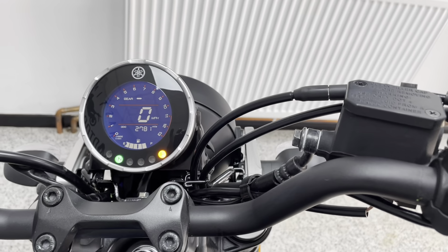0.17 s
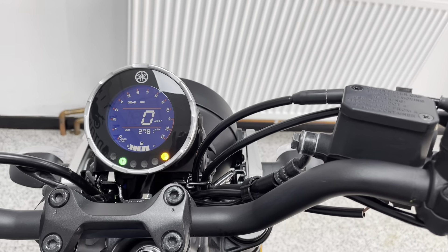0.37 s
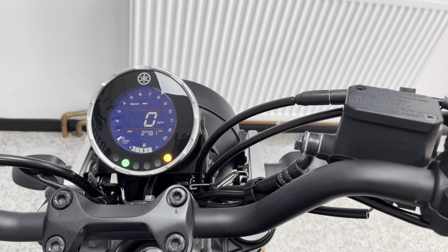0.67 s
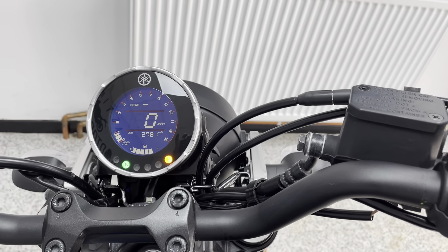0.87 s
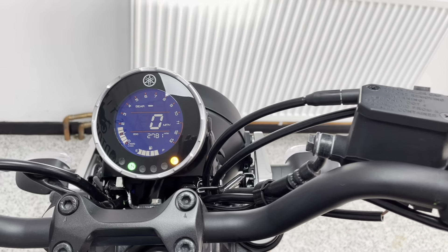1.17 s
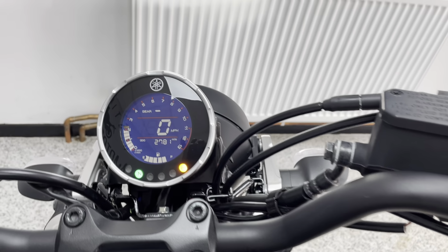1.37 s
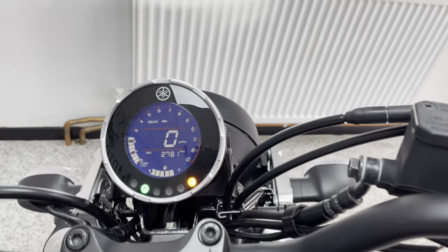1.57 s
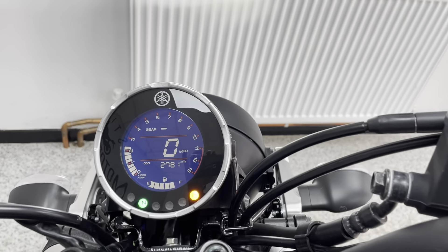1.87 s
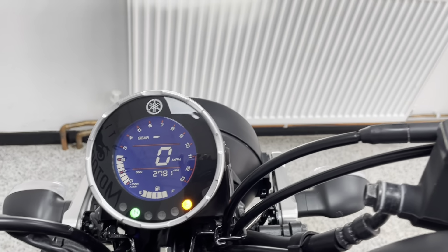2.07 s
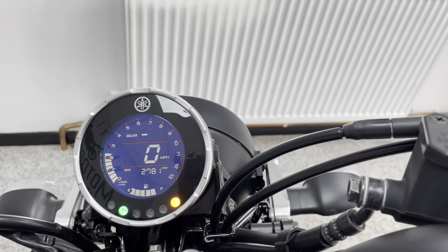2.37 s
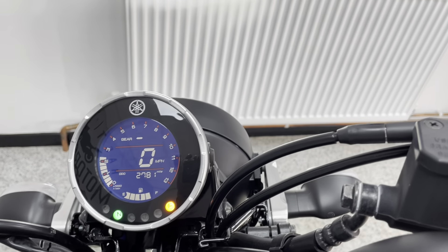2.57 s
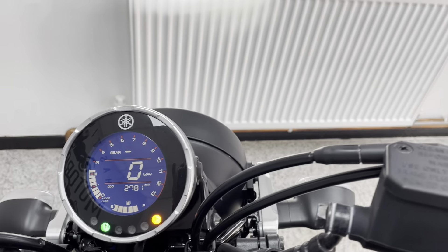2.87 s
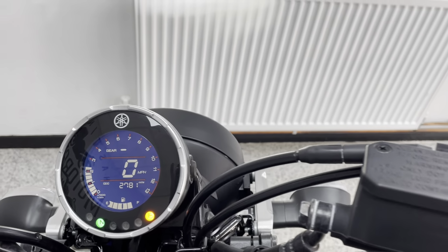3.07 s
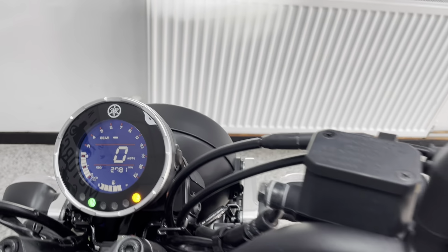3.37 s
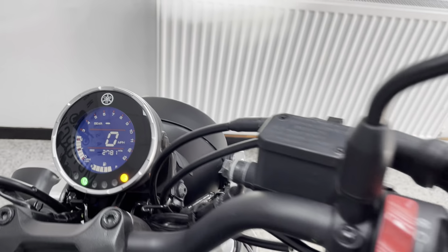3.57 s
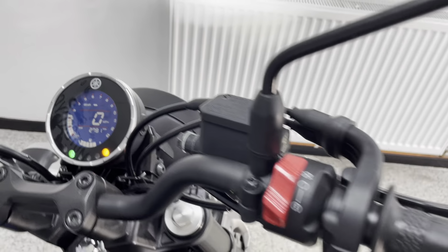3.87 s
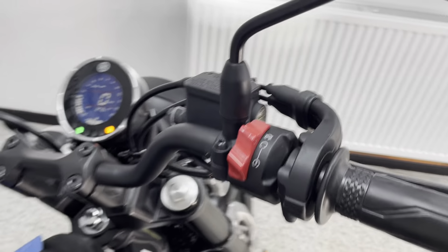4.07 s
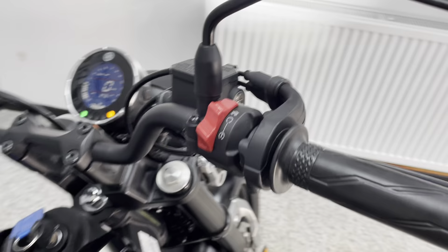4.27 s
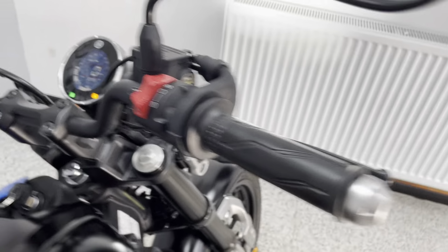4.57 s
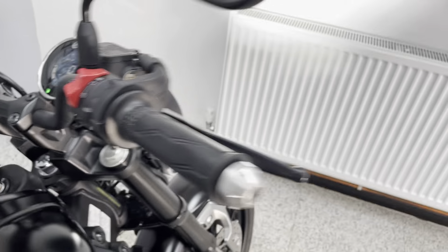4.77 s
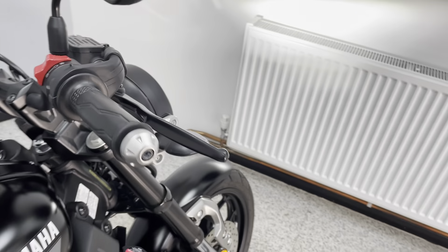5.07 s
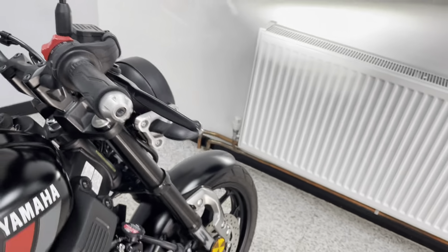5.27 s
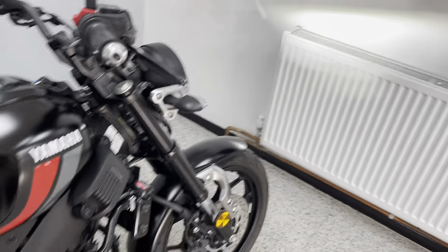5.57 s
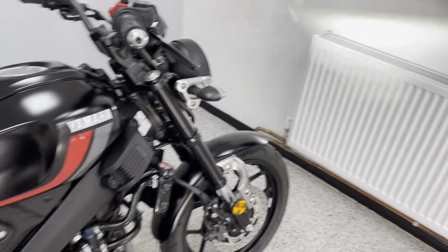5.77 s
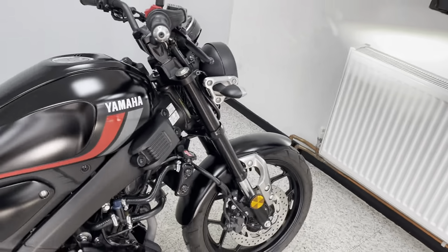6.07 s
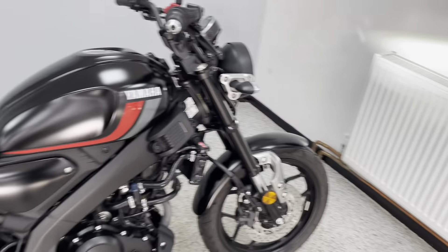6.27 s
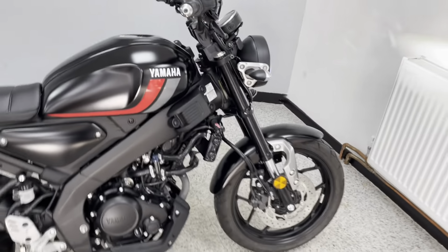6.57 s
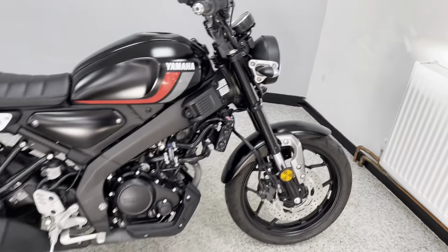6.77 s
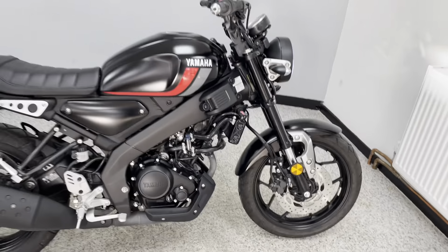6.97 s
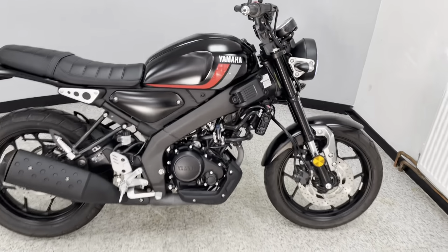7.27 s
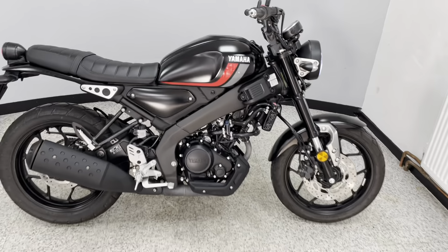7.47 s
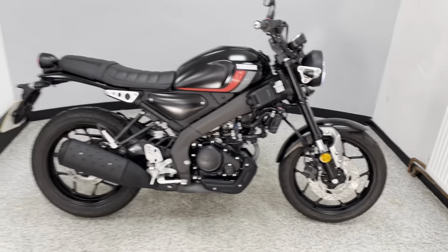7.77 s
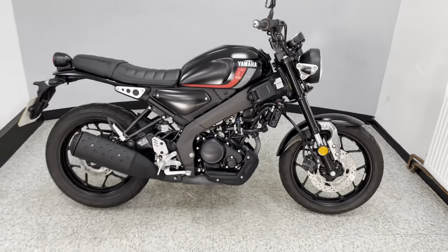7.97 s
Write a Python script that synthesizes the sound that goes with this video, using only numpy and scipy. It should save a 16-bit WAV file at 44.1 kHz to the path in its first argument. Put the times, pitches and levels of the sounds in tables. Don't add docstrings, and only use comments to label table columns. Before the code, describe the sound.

A quiet, hard-walled room with a faint low hum. At about 0.17 s a tiny button click, then a cluster of crisp relay clicks at 0.2-0.3 s. From 0.3 to 0.7 s the starter engages with a clunk, grinding and whining in one long push and a few shorter ones, gear pitch rising, with thin metallic squeals. Around 0.7 s the small single-cylinder engine catches with a hard casing shake; the freed starter whines and hisses away, with clacks near 0.95 s. Firings start slow and uneven, quickening by 1.3 s to a fast idle, about nineteen thumps a second, nearly steady to the end at 8 s. Low, boomy exhaust pulses sit under dry valve ticking, chain rattle and ringing covers. The close phone backs away around the right side: bass swells from 2 s, treble brightens near 3.5-4.5 s, the exhaust drifts across the stereo image, and rattle softens slightly after 6.5 s.

```python
import sys
import numpy as np
from scipy import signal
from scipy.fft import rfft, irfft, next_fast_len
from scipy.io import wavfile
from scipy.ndimage import uniform_filter1d, map_coordinates

SR = 44100
rng = np.random.default_rng(int(sys.argv[2]) if len(sys.argv) > 2 else 0)


def master(y):
    cut = np.clip(np.atleast_2d(y).T, -1, 1)
    pcm = np.round(cut * 32767)
    wavfile.write(sys.argv[1], SR, pcm.astype(np.int16))


def nominal_scale(level):
    x = np.asarray(level, float) / 20
    return 10 ** x


N = 358974
T, SIZE = np.arange(N) / SR, next_fast_len(N, True)
HZ = np.maximum(np.fft.rfftfreq(SIZE, 1 / SR), 1)

# frequency in Hz, level in dB per Hz.
ROOM = [(18, -31), (30, 0), (55, -0.5), (241, -8), (336, -19), (376, -16.5), (654, -21), (816, -18),
        (912, -13), (974, -14), (6000, -44), (7800, -60), (13200, -68)]
# start in seconds, peak in dB, ring in Hz, decay in seconds.
CLICKS = [(.168, -53, 4000, .01), (0.213, -32, 5070, 0.011), (.2164, -30, 4040, 0.009),
          (0.2248, -31.5, 1980, 0.038), (0.251, -34, 4300, 0.013), (.2618, -33, 2980, 0.028),
          (0.2617, -30, 11000, .02), (.2255, -31, 10000, 0.014), (0.294, -38, 3000, 0.022),
          (0.308, -13, 1170, 0.068), (.5317, -23, 2050, .04), (0.619, -25, 1700, .05),
          (0.697, -14, 2080, 0.061), (0.9369, -9, 2520, 0.028), (.947, -16, 1800, 0.08),
          (.9794, -18, 5600, .012), (.995, -18, 1200, 0.055)]
# start in seconds, peak in dB.
THUDS = [
    (.2, -46),
    (.31, -43),
    (.41, -34),
    (.52, -46),
    (.6, -38),
]
# frequency in Hz, level in dB per Hz.
GRIND = [(300, -4.5), (500, -3.5), (800, -2.5), (1200, 2.5), (1800, -2), (2600, -6), (3500, -10.5),
         (5000, -13.5), (6500, -17.5), (7500, -7), (9000, -35), (11000, -22), (14000, -29), (15000, -29.7)]
# frequency in Hz, width in Hz, level in dB.
HOUSING = [(2120, 105, -21), (2320, 30, -26), (3840, 48, -12), (4740, 34, -1), (5000, 35, -8),
           (6160, 36, 5), (6270, 19, 1), (6900, 27, 10), (7660, 32, -9)]
# start in seconds, attack in seconds, hold until in seconds, release in seconds, level in dB.
STROKES = [
    (.315, 0.059, .478, 0.031, 5.5),
    (0.522, 0.013, 0.55, 0.07, 8.5),
    (0.609, .011, 0.661, .017, 7.5),
    (.69, .012, 0.75, .03, -1),
]
# time in seconds, pitch in Hz, level in dB.
MESH = [(.3, 1540, -42), (.36, 1540, -44), (.395, 1555, -30), (.475, 1760, -28.5), (.5, 1790, -45),
        (.55, 2110, -32), (.6, 2060, -42), (.645, 2050, -33), (.72, 2100, -50)]
# start in seconds, end in seconds, frequency in Hz, width in Hz, level in dB.
SQUEALS = [(0.36, 0.517, 6960, 120, -24.5), (0.35, 0.52, 6270, 130, -34), (0.31, 0.53, 5150, 150, -37),
           (0.3, 0.356, 2200, 90, -33), (0.287, 0.47, 1220, 140, -31), (0.503, 0.59, 6200, 170, -32.5),
           (0.604, 0.662, 6270, 150, -26), (.61, 0.71, 7800, 80, -39), (0.61, 0.68, 1717, 220, -25.5),
           (0.48, 0.61, 960, 150, -36)]
# time in seconds, armature turns per second.
COAST_HZ = [(.7, 239), (.72, 240), (.78, 248.5), (.85, 253), (.98, 259), (1.5, 259)]
# time in seconds, whine in dB, brush hiss in dB.
COAST = [(.7, -70, -60), (.72, -45, -55), (.77, -41, -55), (.82, -46, -55), (.86, -51, -54),
         (.98, -50, -48), (1.02, -64, -43), (1.3, -70, -43), (1.5, -70, -58)]
# multiple of the turning speed, level in dB.
COAST_ORDERS = [(1, 12.5), (2, 8), (5, 5), (7, 10), (20, 4)]
# time in seconds, firings per second.
FIRING = [(0.69, 8.938), (0.9, 7.424), (1.0, 12.902), (1.3, 17.801), (1.45, 18.308), (2.45, 18.959),
          (2.95, 18.96), (3.45, 19.604), (4.7, 19.059), (4.95, 19.685), (5.2, 19.209), (5.45, 19.72),
          (5.95, 19.222), (6.7, 18.792), (7.2, 19.188), (7.45, 18.761), (7.7, 19.057), (8.14, 18.636)]
# time in seconds, metres walked, exhaust strength in dB.
PATH = [(.7, 0, -6), (.8, 0, -9), (1.0, 0, -7), (1.24, 0, 0), (1.5, 0.01, -5), (2.1, 0.05, -1.6),
        (2.4, 0.14, .9), (3.0, 0.19, 1.9), (3.5, 0.32, 1.9), (4.1, 0.55, 1.5), (4.6, 0.67, 1.0),
        (5.0, 0.92, 0.6), (5.6, 1.18, 0.5), (6.3, 1.71, 1.0), (6.7, 2.18, 0.1), (7.4, 2.61, -0.2),
        (7.8, 2.8, -0.4), (8.14, 2.99, -1.6)]
# frequency in Hz, level in dB per Hz.
RATTLE = [(300, 5), (420, -7), (600, -4), (850, -1), (1200, -7), (1700, -8), (2400, -10), (3300, -14.5),
          (4500, -18), (6000, -24.5), (8000, -26), (10500, -28), (13000, -29), (15000, -30.5)]
# frequency in Hz, width in Hz, level in dB.
COVERS = [(466, 36, -3.5), (670, 60, -8), (839, 33, -13.5), (1335, 143, -11.5), (3060, 350, -19.5)]
# start in seconds, end in seconds, frequency in Hz, width in Hz, level in dB.
PANELS = [(0.64, 1.43, 1400, 77, -38), (.9, 4.7, 1420, 130, -40.5), (1.5, 2.8, 2950, 120, -45),
          (3.79, 4.44, 1900, 97, -35.5), (3.97, 4.53, 2100, 130, -37), (3.7, 4.45, 1610, 65, -37.5),
          (4.06, 4.84, 1460, 120, -37), (3.43, 4.7, 590, 64, -39), (3.7, 6.55, 3140, 230, -37.5),
          (5, 5.4, 2200, 96, -38), (5.82, 6.74, 1440, 76, -33.5), (6.48, 7.46, 1640, 88, -35),
          (6.3, 8, 2750, 130, -43), (4.9, 8.7, 3355, 410, -38), (6.2, 8.6, 2950, 160, -38.5),
          (7.2, 9.3, 1550, 200, -37)]
# start in seconds, low boost in dB, high boost in dB, fade in seconds.
CATCHES = [
    (.66, 16, 8, 0.031),
    (.98, 1.5, 6.5, 0.17),
    (1.2, 3, 0, 0.046),
]
# middle in seconds, half length in seconds, level in dB.
COVER_RINGS = [(.74, .05, 10), (1.45, 0.066, 1), (2.31, 0.062, 10), (2.85, 0.054, 9), (3.16, 0.2, 11),
               (3.72, 0.27, 9), (4.2, 0.19, 9), (4.673, 0.25, 8.5), (6.04, 0.34, 14.5), (7.4, 0.67, 7.5)]
# frequency in Hz, crest level in dB, standing share 0-1, crest position in m, crest spacing in m.
WAVES = [(76, -22, .98, 1.82, 5.84), (96, -15, .35, 1.17, 2.33), (115, -22.8, .14, 1.11, 1.76),
         (134, -30.4, .11, 1.05, 1.25), (153, -31, .36, 2.63, 3.94), (172, -37.5, .45, .385, 1.47),
         (191, -30, .45, .3, 6.5), (210, -34.7, .3, 1.1, 3.2)]
# frequency in Hz, lead of the left port in radians.
PORTS = [(0, 0), (700, .3), (1400, .7), (3400, .4), (5500, .2), (6900, -1.3), (7700, -2.95), (8900, -3.35),
         (10600, -6.1), (12200, -6.45), (13700, -8.6), (14200, -9.3), (16000, -9.5)]
# frequency in Hz, likeness 0-1.
LIKENESS = [(30, 1), (60, 0.97), (200, 1), (500, 0.56), (1400, 0.37), (3000, 0.54), (6000, 0.62),
            (8000, 0.94), (12000, 0.34), (14000, 0.83)]


def level(x):
    return x / np.sqrt(np.mean(x ** 2))


def curves(table):
    s, *columns = np.transpose(table)
    return [np.interp(T, s, c) for c in columns]


def over_hz(table):
    hz, value = np.transpose(table)
    return np.interp(np.log(HZ), np.log(np.maximum(hz, 1)), value)


def shaped(x, gain):
    return irfft(rfft(x, SIZE) * gain, SIZE)[:N]


def noise():
    return rng.standard_normal(N)


def ring(hz, width):
    return 1j * HZ * width / (hz ** 2 - HZ ** 2 + 1j * HZ * width)


def tail(decay_s):
    return 1 / (1 + 2j * np.pi * HZ * decay_s)


def step(x, at, width):
    return .5 + .5 * np.tanh((x - at) / width)


def wander(rate):
    k = int(SR / rate)
    held = np.repeat(rng.standard_normal(N // k + 1), k)
    return uniform_filter1d(uniform_filter1d(held, k), k)[:N]


def ticks(phase, scatter_db):
    at = np.flatnonzero(np.diff(np.floor(phase), prepend=np.floor(phase[0])) > 0)
    out = np.zeros(N)
    out[at] = nominal_scale(scatter_db * rng.standard_normal(len(at)))
    return out


def moving(x, hz, width):
    carrier = np.sin(2 * np.pi * np.cumsum(hz) / SR)
    return level(shaped(x, tail(1 / (np.pi * width))) * carrier)


def glints(table, x):
    out, spectrum = np.zeros(N), rfft(x, SIZE)
    for start, end, hz, width, db in table:
        swell = np.sin(np.pi * np.clip((T - start) / (end - start), 0, 1))
        out += nominal_scale(db) * swell * level(irfft(spectrum * ring(hz, width) ** 2, SIZE)[:N])
    return out


def room_tone():
    colour = nominal_scale(over_hz(ROOM))
    return [nominal_scale(-51 + 0.8 * wander(28)) * level(shaped(noise(), colour)) for _ in range(2)]


def knocks():
    out, t = np.zeros(N), np.arange(4096) / SR
    for s, db, hz, decay in CLICKS:
        snap = rng.standard_normal(4096)
        part = signal.butter(1, [0.66 * hz, 1.18 * hz], "band", fs=SR, output="sos")
        crack = .13 * snap + signal.sosfilt(part, snap)
        fade = np.exp(-np.log(1000) * t / max(decay, .005))
        out[int(s * SR):][:4096] += nominal_scale(db) * level(crack) * fade / 2
    for s, db in THUDS:
        out[int(s * SR):][:4096] += nominal_scale(db) * np.sin(2 * np.pi * 42 * t) * np.sin(np.pi * t / t[-1]) ** 2
    return shaped(out, 1 / (1 + (HZ / 9000) ** 2))


def coasting_whine():
    (turns,) = curves(COAST_HZ)
    turn = 2 * np.pi * np.cumsum(turns * (1 + 0.0015 * wander(53.7))) / SR
    return sum(nominal_scale(db + 2.9 * wander(39.2)) * np.sin(k * turn) for k, db in COAST_ORDERS)


def starter():
    grind_db = -30
    for start, attack, until, release, db in STROKES:
        push = np.minimum((T - start) / attack, 1 - (T - until) / release)
        grind_db = grind_db + db * np.clip(push, 0, 1)
    rings = sum(1.55 * nominal_scale(db / 2) * np.abs(ring(hz, w)) for hz, w, db in HOUSING)
    colour = nominal_scale(over_hz(GRIND)) * (0.59 + rings)
    on = (T > .306) * np.clip((.8 - T) / 0.091, 0, 1)
    mesh_hz, mesh_db = curves(MESH)
    mesh = nominal_scale(mesh_db + 3.5 * wander(70)) * moving(.05 + noise(), mesh_hz, 75)
    coast_db, brush_db = curves(COAST)
    tones = 1.9 * on * mesh + nominal_scale(coast_db) * coasting_whine() * (T > .7) * (T < 1.06)
    tones += glints(SQUEALS, noise())
    grind = on * nominal_scale(grind_db + 1.2 * wander(67.5))
    brush = nominal_scale(brush_db) * (T > .7) * (T < 1.5)
    brush_colour = ring(6400, 1500) ** 2 + 0.17 * ring(12500, 5000) ** 2
    pair = []
    for lag in (0, 300):
        n = noise()
        hiss = grind * level(shaped(n, colour)) + brush * level(shaped(n, brush_colour))
        pair.append(np.roll(tones, lag) + hiss)
    return pair


def casing_levels(walked):
    away = step(walked, 2, 0.073)
    faint = 1 - step(T, 0.92, 0.056)
    flank = step(walked, 0.39, 0.2)
    low = -28.5 - 2 * away - 10.5 * faint
    high = -34 - 0.76 * away - 3 * faint + 4 * flank
    for s, low_db, high_db, fade in CATCHES:
        shake = (T > s) * np.exp(-np.maximum(T - s, 0) / fade)
        low, high = low + low_db * shake, high + high_db * shake
    rings = sum(db * np.exp(-((T - s) / half) ** 2) for s, half, db in COVER_RINGS)
    return low, high, -38.5 - 4 * away - 10.5 * faint + rings


def repeating(cycle, hold):
    patterns, age = rng.standard_normal((200, 2048)), np.maximum(cycle, 0) / hold
    blend = map_coordinates(patterns, [age, cycle % 1 * 2047], order=1)
    return level(blend / np.hypot(age % 1, 1 - age % 1))


def reflected(x):
    out, views = np.zeros(N), np.linspace(0, T[-1], num=9)
    for k in range(len(views)):
        ripple = level(uniform_filter1d(rng.standard_normal(len(HZ)), int(45 * SIZE / SR)))
        comb = nominal_scale(3.26 / (1 + HZ / 4000) * ripple)
        near = np.interp(T, views, np.arange(len(views)) == k)
        out += np.sqrt(near) * shaped(x, comb)
    return out


def casing(cycle):
    low_db, high_db, cover_db = casing_levels(curves(PATH)[0])
    valves = ticks(4 * cycle + 0.077 * np.sin(2 * np.pi * cycle), 7.7)
    valves += 1.1 * ticks(25 * T, 1.2) + 3.9 * ticks(12.5 * T, 4.0)
    taps = level(shaped(valves, tail(0.0032) * tail(0.0016)))
    gate = 2.5 + 0.23 * taps + 0.039 * np.cos(2 * np.pi * cycle)
    colour = nominal_scale(over_hz(RATTLE)) * (0.49 + sum(nominal_scale(db) * np.abs(ring(hz, w)) for hz, w, db in COVERS))
    blow = 1 + 0.5 * np.exp(-((cycle + .15) % 1) / 0.29)
    split = 1 / (1 + (HZ / 1400) ** 4)
    low_colour = colour * split * HZ ** 3 / (HZ ** 3 + 280 ** 3)
    pair = []
    for _ in range(2):
        raw = noise() + 0.74 * repeating(cycle, hold=5.0)
        rattle = gate * raw
        combed = gate * reflected(raw) * nominal_scale(0.36 * wander(9))
        low = nominal_scale(low_db) * level(shaped(combed * np.sqrt(blow), low_colour))
        high = nominal_scale(high_db) * level(shaped(combed, colour * (1 - split)))
        cover = nominal_scale(cover_db - 4.5) * level(shaped(rattle * blow, ring(940.6, 77) ** 2))
        pair.append(low + high + cover)
    panels = glints(PANELS, rattle * blow)
    return (pair + np.array([panels, 0.99 * np.roll(panels, 300)])) * np.clip((T - .66) / 0.033, 0, 1)


def exhaust(cycle):
    walked, strength_db = curves(PATH)
    slow = np.clip((18.2 - curves(FIRING)[0]) / 6, 0, 1)
    puffs = ticks(cycle + 0.024, 0.2) + 0.2 * slow * ticks(cycle + .55, 3.6)
    thump = -shaped(puffs, ring(84, 37) * (1 + 1.5 * ring(99, 14)))

    def band(hz, half):
        return level(shaped(thump, np.exp(-((HZ - hz) / half) ** 4)))

    out = np.zeros(N)
    for hz, db, share, crest, spacing in WAVES:
        standing = 1 - share + share * np.cos(2 * np.pi * (walked - crest) / spacing)
        out += nominal_scale(strength_db - 0.06) * nominal_scale(db) * standing * band(hz, 10.5)
    out += nominal_scale(strength_db - 39.5 - 10 * slow) * band(144.7, 6)
    out += nominal_scale(-43) * band(41.0, 24) + nominal_scale(-43.0) * band(255, 34) + nominal_scale(-49.5) * band(372, 20)
    out += nominal_scale(-37.5 + 8.3 * slow) * level(shaped(noise(), ring(114, 110) * ring(70, 130)))
    return out * np.clip((T - .675) / 0.0086, 0, 1)


def ports(direct, diffuse, pan_db):
    like = np.clip(over_hz(LIKENESS), 0, 1)
    turn = np.exp(.5j * np.interp(HZ, *np.transpose(PORTS)))
    mid = rfft(direct, SIZE) * np.sqrt((1 + like) / 2)
    side = rfft(diffuse, SIZE) * np.sqrt((1 - like) / 2)
    left = irfft((mid + side) * turn, SIZE)[:N]
    right = irfft((mid - side) / turn, SIZE)[:N]
    return np.array([left * nominal_scale(pan_db / 2), right * nominal_scale(-pan_db / 2)])


def scene():
    cycle = np.cumsum(curves(FIRING)[0]) / SR
    cycle -= cycle[int(FIRING[0][0] * SR)] + .03
    walked = curves(PATH)[0]
    hits, boom = knocks(), exhaust(cycle)
    direct, diffuse = np.array(room_tone()) + starter() + casing(cycle)
    late_hits, late_boom = np.roll(hits, int(.003 * SR)), nominal_scale(2) * np.roll(boom, int(0.0024 * SR))
    boom_pan_db = -1.3 + 3 * np.tanh((walked - 0.79) / 0.45)
    parts = ports(direct + hits, diffuse + late_hits, 2.5 - 0.47 * walked)
    return parts + ports(boom, late_boom, boom_pan_db)


def roll_off(x):
    return signal.sosfilt(signal.butter(12, 15720, fs=SR, output="sos"), x)


def record(dry):
    top = signal.ellip(10, .2, 90, 15650, fs=SR, output="sos")
    rounded = np.tanh(.3 * dry) / 0.31
    return roll_off(signal.sosfilt(top, rounded))


dry = scene()
out = record(dry)
master(out)
```